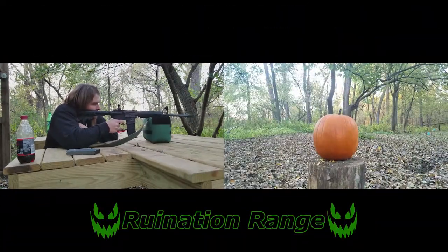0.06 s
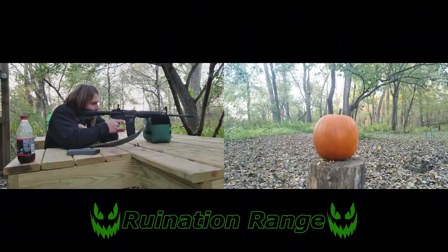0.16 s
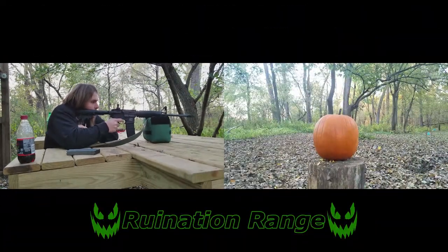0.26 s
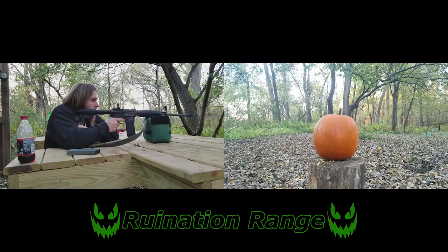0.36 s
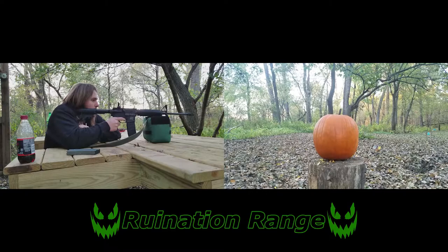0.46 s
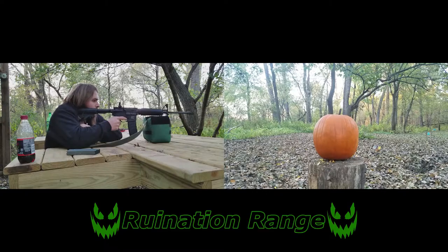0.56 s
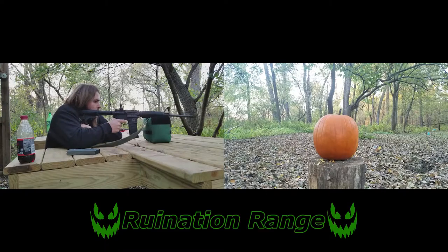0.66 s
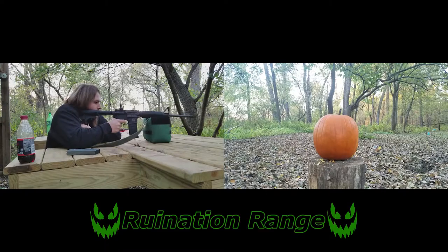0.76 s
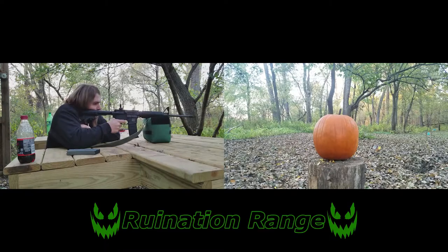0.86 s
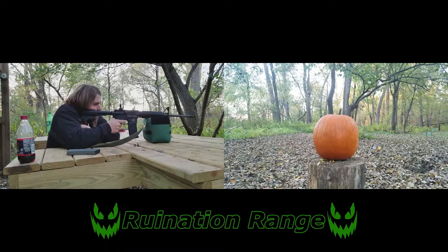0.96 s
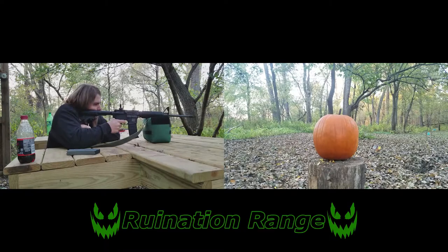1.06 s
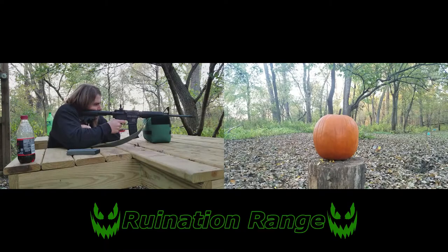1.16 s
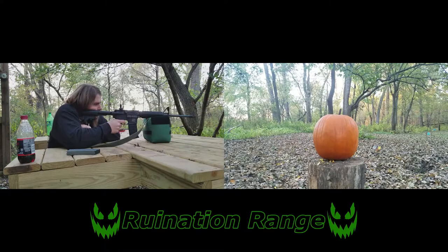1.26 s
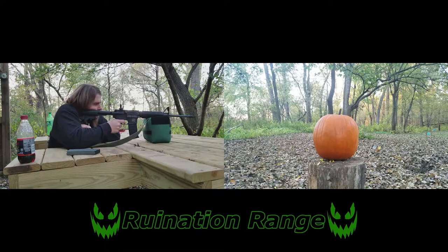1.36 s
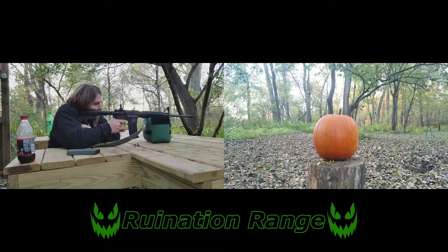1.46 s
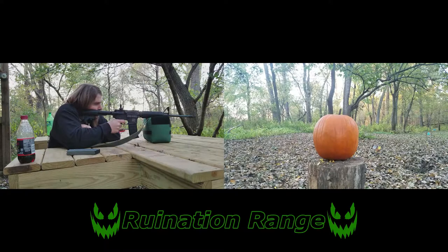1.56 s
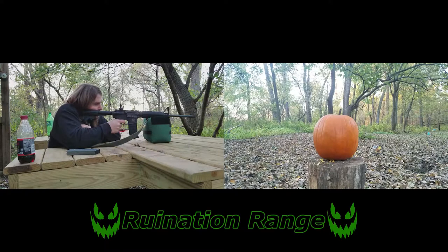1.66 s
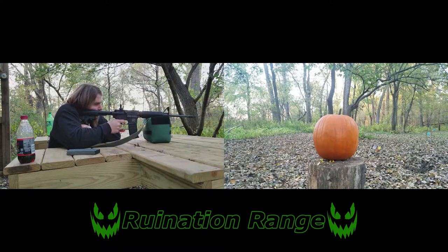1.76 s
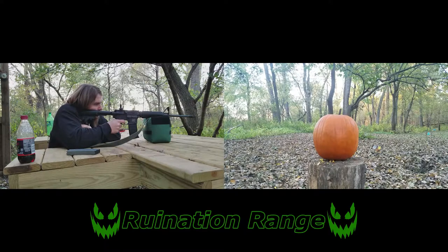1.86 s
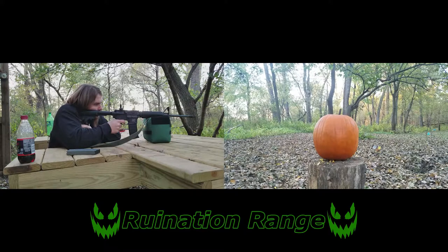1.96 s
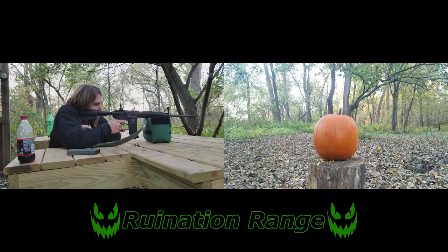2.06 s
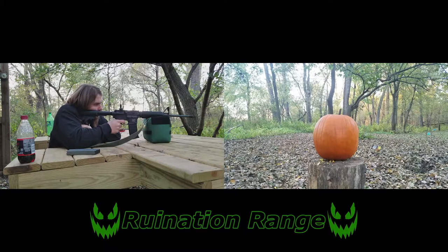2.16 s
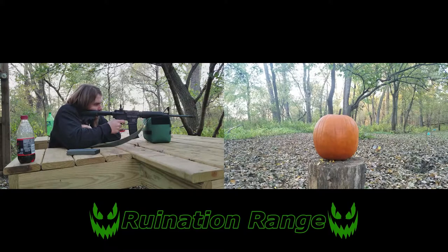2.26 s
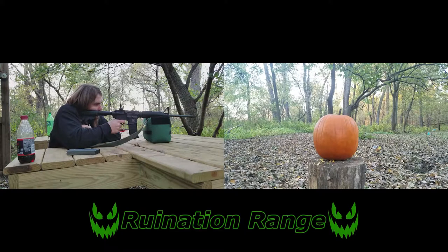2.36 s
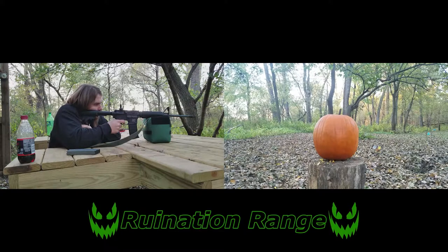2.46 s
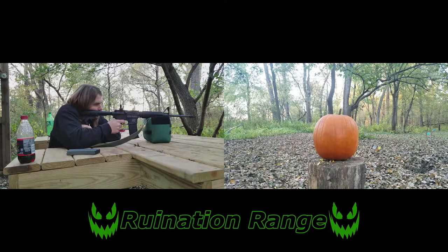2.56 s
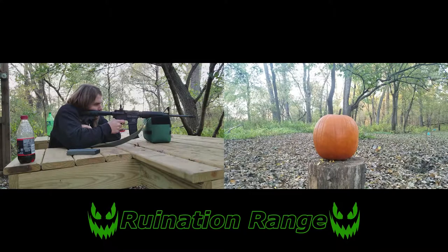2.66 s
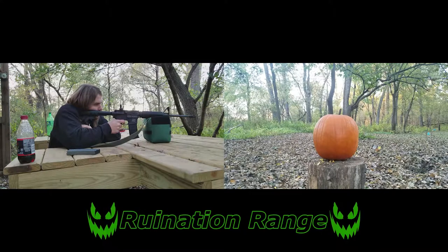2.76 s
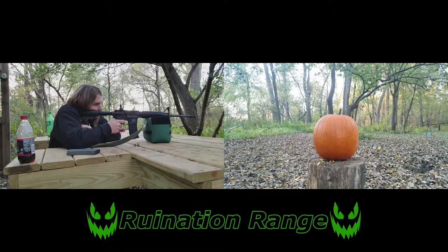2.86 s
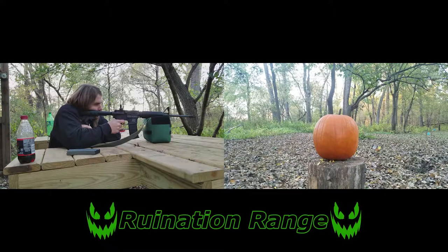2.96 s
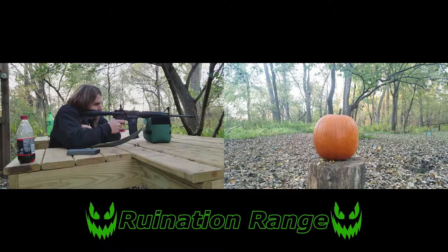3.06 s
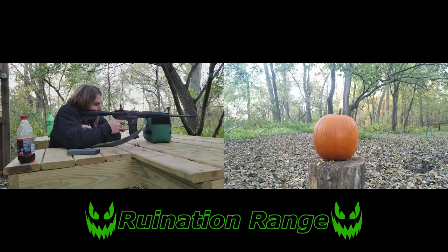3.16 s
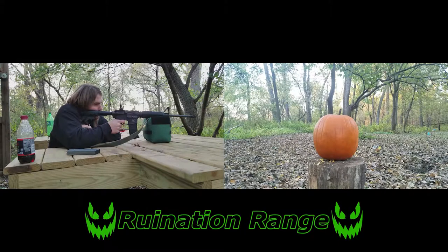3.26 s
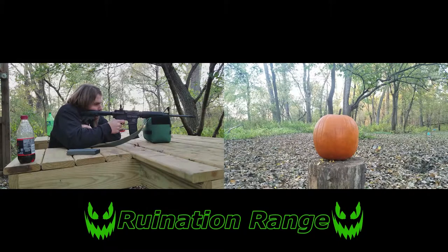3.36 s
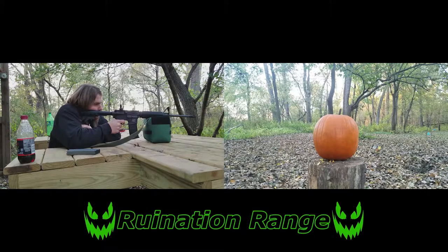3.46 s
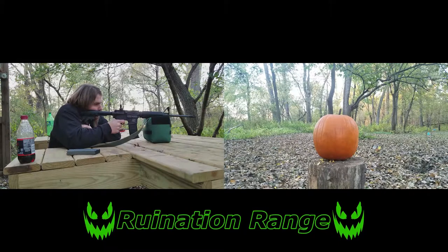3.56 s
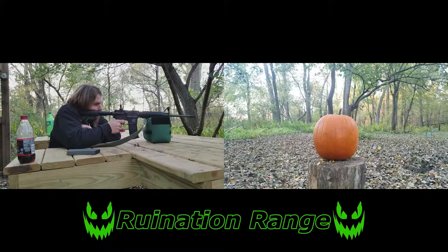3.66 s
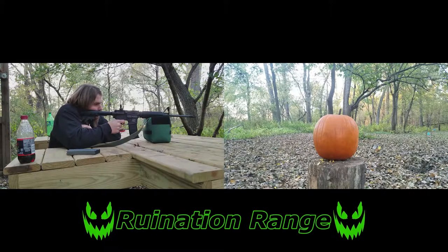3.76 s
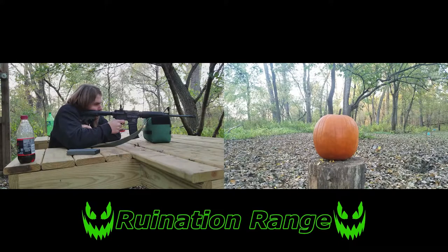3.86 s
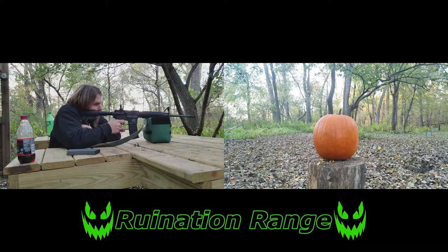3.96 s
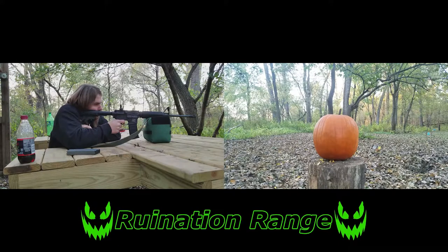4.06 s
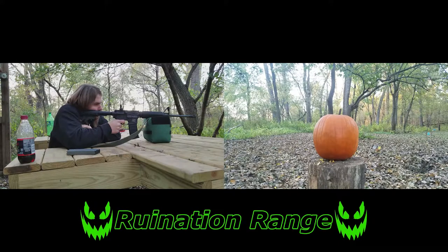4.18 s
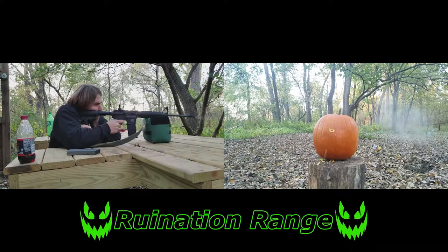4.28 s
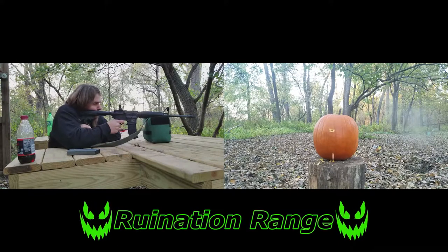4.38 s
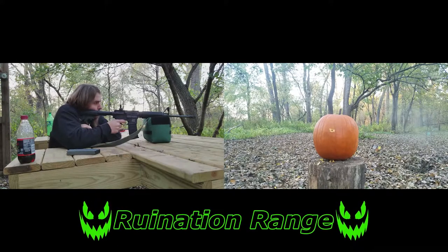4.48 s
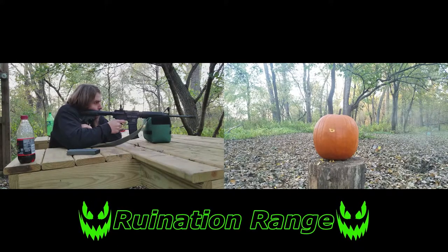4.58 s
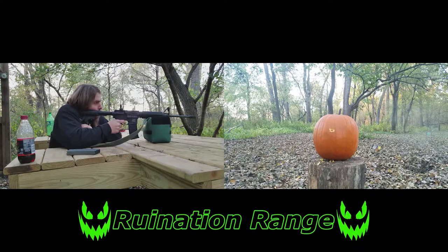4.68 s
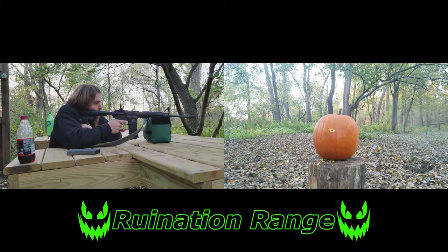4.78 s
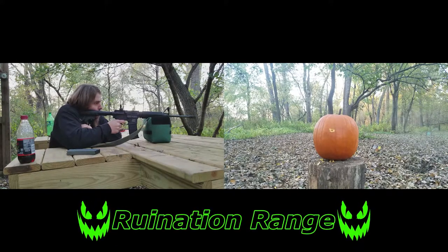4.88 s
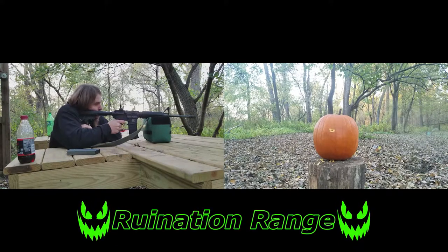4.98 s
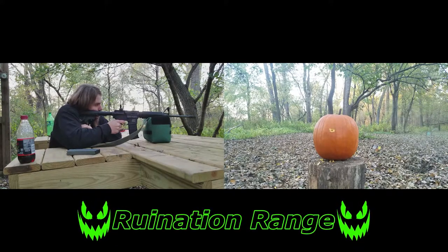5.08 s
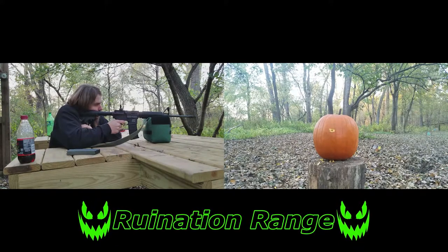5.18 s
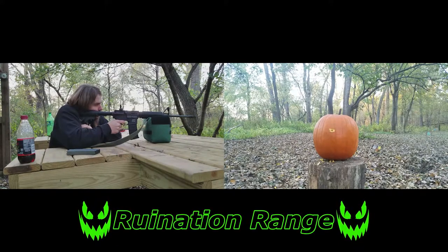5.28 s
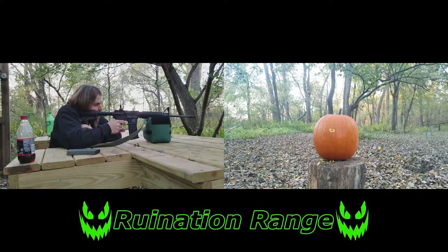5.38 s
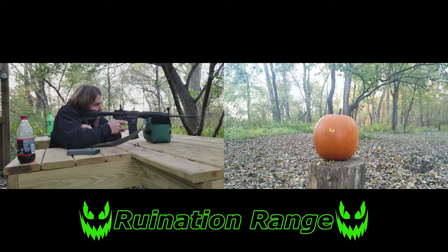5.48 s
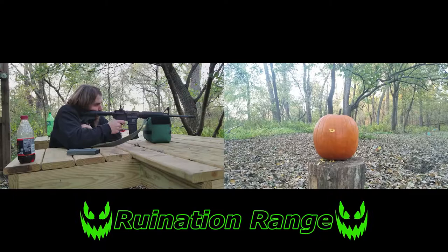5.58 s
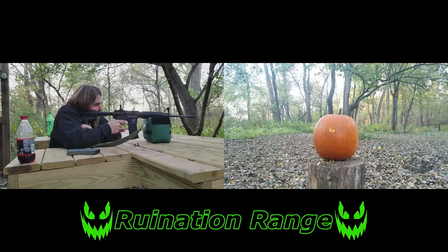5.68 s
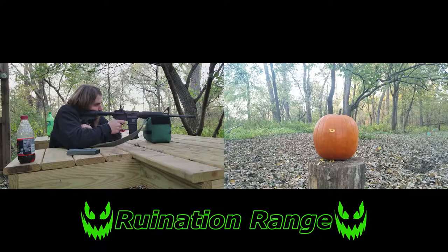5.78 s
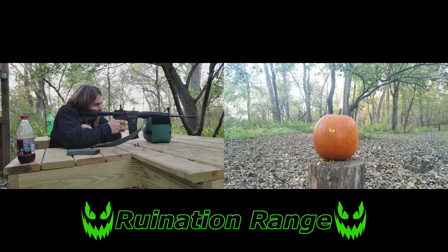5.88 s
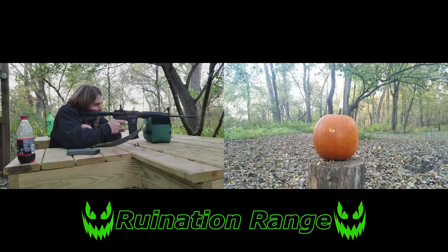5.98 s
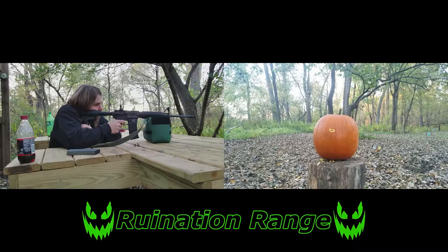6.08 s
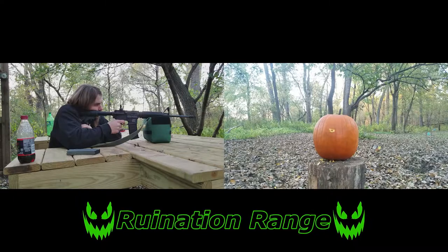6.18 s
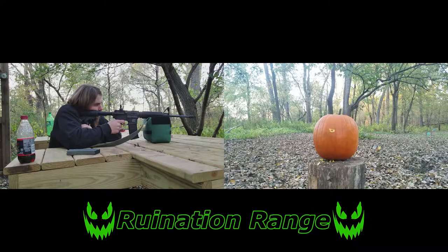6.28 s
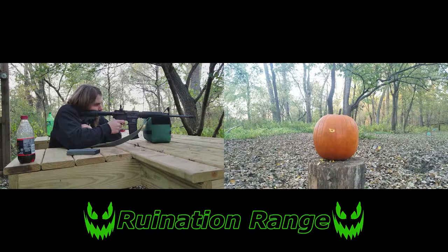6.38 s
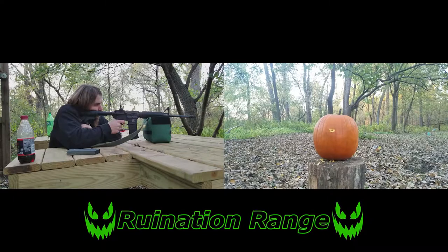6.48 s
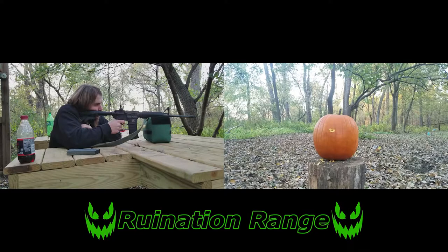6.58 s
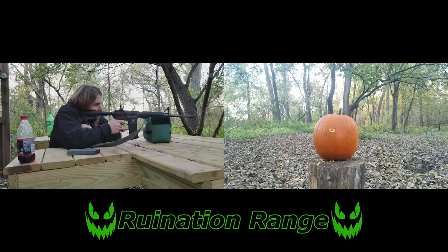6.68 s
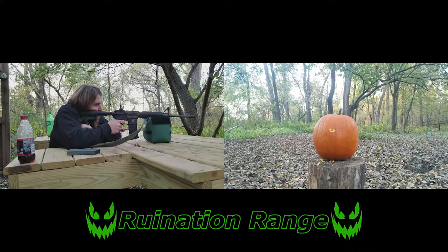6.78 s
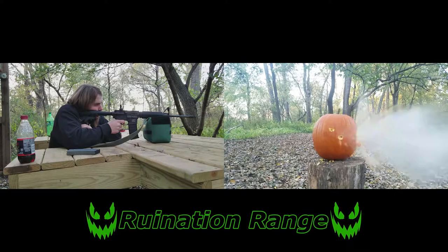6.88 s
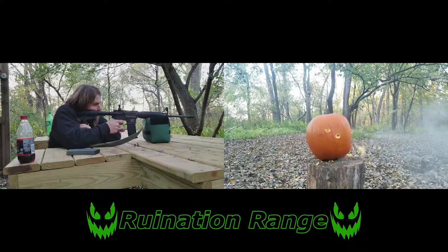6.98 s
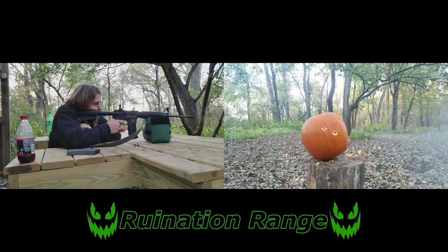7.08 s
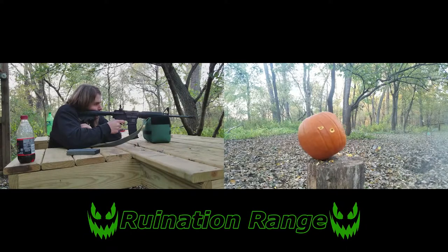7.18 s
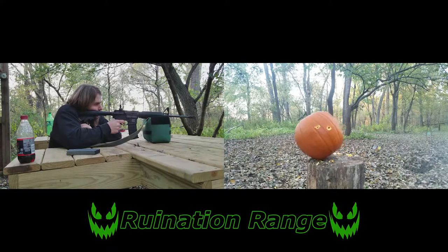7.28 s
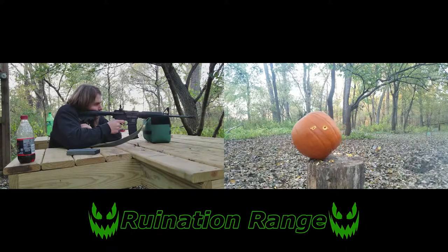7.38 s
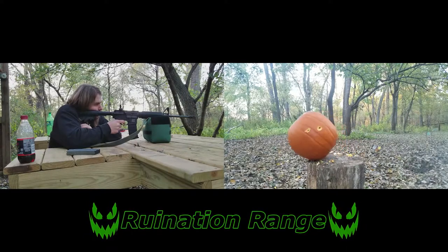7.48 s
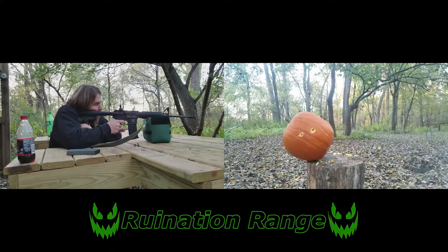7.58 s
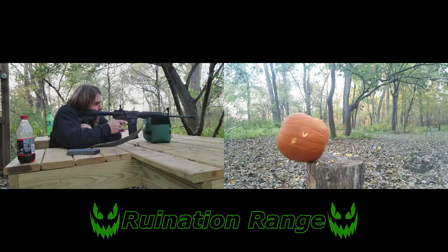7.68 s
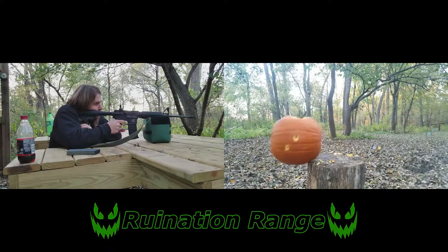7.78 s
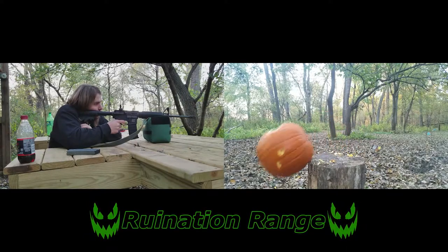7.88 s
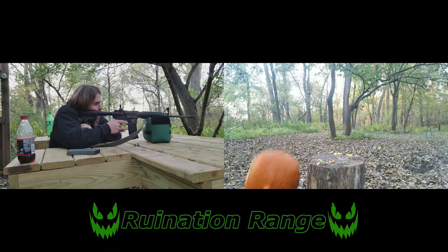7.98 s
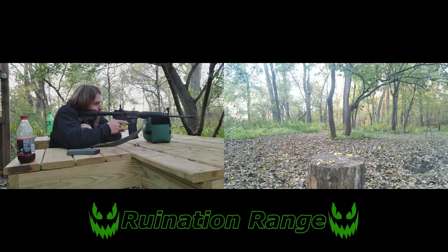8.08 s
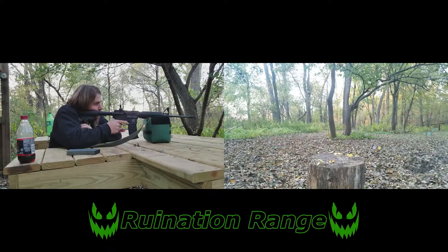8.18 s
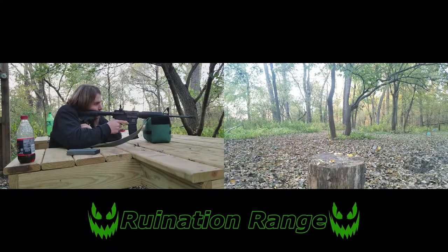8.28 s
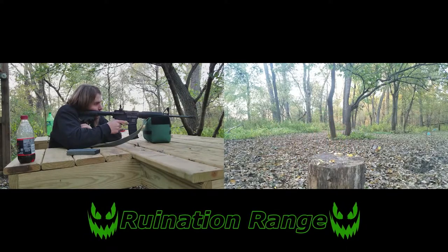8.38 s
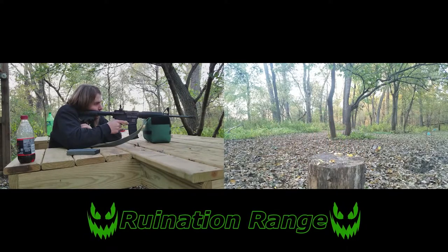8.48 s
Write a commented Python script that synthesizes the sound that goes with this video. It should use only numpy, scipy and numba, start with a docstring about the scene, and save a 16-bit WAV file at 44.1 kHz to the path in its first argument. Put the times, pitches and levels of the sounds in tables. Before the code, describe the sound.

Clothing rustles faintly and a rifle's safety catch snaps with a sharp metal click. After a quiet wait, two very loud shots come nearly three seconds apart, each overloading the small, close microphone and echoing through the woods. Light ticks and rustling fall between them. At the end a pumpkin drops with a soft thump among dry leaves, over faint hiss and distant engine drone.

```python
"""Two rifle shots from a wooden bench in a wood, close to a small camera microphone.
The safety catch clicks first. Each blast overloads the capsule, rings among the near trunks and rolls
back from the far tree line while the gain ducks and recovers. Cloth and leaves rustle, small things tick
and a pumpkin thumps down off its stump. Far off, engines drone and a bird whistles once."""
import sys
import numpy as np
from scipy import signal
from scipy.fft import rfft, irfft
from scipy.io import wavfile
from scipy.ndimage import uniform_filter1d
from numba import njit

SR = 44100
rng = np.random.default_rng(int(sys.argv[2]) if len(sys.argv) > 2 else 0)


def output_pcm(signal):
    """Save a mono or channel-first signal as 16-bit PCM at the path in sys.argv[1].

    Samples are clipped to [-1, 1] before scaling.
    """
    pcm = np.clip(np.atleast_2d(signal).T, -1, 1) * 32767
    wavfile.write(sys.argv[1], SR, np.round(pcm).astype(np.int16))


N = 376481


def undb(db):
    return 10 ** (np.asarray(db) / 20)


def unit(x):
    return x / np.sqrt(np.mean(x ** 2))


def add(out, start_s, x):
    i = int(round(start_s * SR))
    out[i:i + len(x)] += x[:len(out) - i]


def band(x, hz, width_hz):
    """Resonance with gain 1 at its centre."""
    return signal.lfilter(*signal.iirpeak(min(hz, .45 * SR), hz / width_hz, fs=SR), x)


def walk(rate_hz):
    """Smooth wander from one random level to the next."""
    step = int(SR / rate_hz)
    return 0.66 * uniform_filter1d(np.repeat(rng.standard_normal(N // step + 1), step), step)[:N]


def at_hz(table, hz):
    """The columns of a spectrum table, read on a log-frequency axis."""
    freqs, *columns = np.array(table, float).T
    return [np.interp(np.log(hz), np.log(freqs), column) for column in columns]


def burst(peak_db, hz, width_hz, t60_s):
    """A decaying puff of noise in one resonance."""
    t = np.arange(int(.6 * SR)) / SR
    noise = band(band(rng.standard_normal(len(t)), hz, width_hz), hz, 2 * width_hz)
    puff = noise * undb(-60 * t / t60_s) * np.minimum(t / 0.00013, 1)
    return undb(peak_db) * puff / abs(puff).max()


def noise_floor():
    """The recorder's steady electronic hiss over a far rumble that swells a little."""
    # freq_hz, density_db
    floor_spectrum = [(12, -31), (25, 10.5), (59, 8), (106, -5), (133, -14), (196, -10.5), (225, -22.5),
                      (252, -21), (465, -26), (932, -42.5), (1670, -37), (4310, -34.5), (9000, -34),
                      (15500, -34)]
    density_db, = at_hz(floor_spectrum, np.maximum(np.arange(N // 2 + 1) * SR / N, 1))
    noise = undb(-57.5) * unit(irfft(rfft(rng.standard_normal(N)) * undb(density_db), N))
    rumble = band(band(noise, 90, 150), 90, 150)
    return noise + rumble * (undb(1.5 * walk(5)) - 1)


def engines():
    """Distant engines: narrow bands of low noise that waver in level."""
    # pitch_hz, width_hz, level_db
    drones = [(99, 16, -64), (193, 41, -77)]
    return sum(undb(db + 2.5 * walk(4)) * unit(band(rng.standard_normal(N), hz, width))
               for hz, width, db in drones)


def bird():
    """One thin, fluttering whistle far off, falling slightly."""
    start_s, length_s, from_hz, to_hz, level_db = 2.685, .2, 5600, 5480, -74.5
    out, size = np.zeros(N), int(length_s * SR)
    progress = np.arange(size) / size
    pitch_hz = from_hz + (to_hz - from_hz) * progress + 45 * walk(150)[:size]
    envelope = undb(level_db + 5.5 * walk(90)[:size]) * np.sin(np.pi * progress ** 0.21)
    add(out, start_s, envelope * np.sin(2 * np.pi * np.cumsum(pitch_hz) / SR))
    return out


def rustle():
    """Sleeves and dry leaves moving: grainy bright hiss over a dull rub."""
    # peak_s, rise_s, fall_s, hiss_db, rub_db
    swishes = [(.01, .05, 0.062, -66, -55.5), (.19, 0.12, 0.089, -74.5, -76), (.36, 0.044, 0.043, -77, -73),
               (.465, 0.055, 0.047, -60, -65), (.57, 0.06, 0.1, -84, -70), (.77, 0.047, 0.15, -76, -65),
               (5.25, 0.16, 0.24, -66, -64), (5.68, 0.14, 0.17, -61, -64), (5.85, 0.034, 0.16, -63, -72),
               (6.02, .08, 0.098, -69.5, -68), (6.2, 0.11, 0.11, -67.5, -84), (6.5, 0.12, .15, -80, -85),
               (7.73, 0.029, .1, -56, -72), (8.09, 0.092, 0.097, -61.5, -64), (8.2, 0.03, 0.1, -56, -70),
               (8.37, .04, .08, -62, -72), (8.48, 0.028, 0.06, -55.5, -72)]
    t, out = np.arange(N) / SR, 0
    grain = undb(1.6 * walk(170) + 1.8 * walk(45))
    treble = signal.sosfilt(signal.butter(3, [2500, 9500], "band", fs=SR, output="sos"),
                            rng.standard_normal(N))
    hiss = unit(grain * (band(treble, 3020, 2500) + 0.52 * treble))
    rub = unit(grain * band(rng.standard_normal(N), 495.8, 588))
    for peak_s, rise_s, fall_s, hiss_db, rub_db in swishes:
        swell = np.exp(-((t - peak_s) / np.where(t < peak_s, rise_s, fall_s)) ** 2)
        out += swell * (undb(hiss_db) * hiss + undb(rub_db) * rub)
    return out


def ticks():
    """Small ticks around the bench and stump, each with a weaker, broader edge above its pitch."""
    # start_s, peak_db, pitch_hz, t60_s
    contacts = [(.343, -52.5, 7000, 0.022), (.725, -48, 1410, 0.026), (0.772, -51, 1550, .033),
                (2.487, -57.5, 1310, 0.078), (2.655, -73, 2800, .03), (3.392, -67.5, 850, .05),
                (3.412, -69, 850, .04), (5.047, -48, 7000, .02), (5.094, -34, 4000, 0.093),
                (5.106, -46, 6500, .08), (5.137, -48, 7000, .033), (5.222, -50, 7500, .02),
                (5.311, -42, 3040, .024), (5.332, -35.5, 3040, .03), (5.921, -48, 3500, 0.048),
                (6.004, -47.5, 2600, 0.021), (6.006, -50, 1400, 0.033), (6.478, -61, 3720, .033),
                (6.495, -63, 3700, .03), (6.69, -70, 2800, .044), (7.431, -35, 8540, .02),
                (7.762, -54, 7000, .03), (7.797, -55, 8000, .03)]
    out = np.zeros(N)
    for start_s, db, hz, t60 in contacts:
        body = burst(db, hz, hz / 2.6, t60)
        edge = burst(db - 5.5, min(2.2 * hz, 11000), hz, t60)
        add(out, start_s, body + edge)
    return out


def knocks():
    """Dull knocks on wood, each sounding a few broad modes."""
    # start_s, level_db
    blows = [(.025, -53), (.836, -48.5), (0.857, -49), (.925, -63)]
    # pitch_hz, width_hz, gain_db, t60_s
    modes = [(520, 71, 0, 0.15), (750, 730, -3, 0.091), (930, 160, -5, 0.17), (1600, 740, -14, .06)]
    out = np.zeros(N)
    for start_s, db in blows:
        add(out, start_s, sum(burst(db + gain, hz, width, t60) for hz, width, gain, t60 in modes))
    return out


def thumps():
    """Soft heavy contacts that sag in pitch as they die; the last ones are the pumpkin landing."""
    # start_s, level_db, pitch_hz, t60_s
    contacts = [(.575, -44, 100.3, 0.194), (8.188, -28, 151, 0.11), (8.242, -22, 193, 0.053),
                (8.276, -30, 151, .08)]
    rise_s, sag_share = 0.002, 0.2976
    out, t = np.zeros(N), np.arange(int(.4 * SR)) / SR
    for start_s, db, hz, t60 in contacts:
        pitch_hz = hz * (1 - sag_share * np.minimum(t / t60, 1))
        envelope = undb(db - 60 * t / t60) * (1 - np.exp(-t / rise_s))
        add(out, start_s, envelope * np.sin(2 * np.pi * np.cumsum(pitch_hz) / SR))
    return out


def safety_catch():
    """A steel lever snaps home by the microphone: its modes, a crack and a tail off the bench."""
    # start_s, level_db
    blows = [(.6285, -24), (.6313, -9), (.6338, -18)]
    # steel lever: pitch_hz, gain_db, t60_s (capped below)
    modes = [(700, 6.5, 0.15), (1310, 2, 0.073), (1480, 9, 0.043), (2620, -1, 0.059), (2930, -28.5, 0.25),
             (3545, -24, 0.012), (3600, -26.5, 0.066), (4110, -1.5, 0.091), (4200, -38.5, 0.045),
             (4850, -26.5, 0.073), (5770, -39, 0.079), (6971, -20.5, 0.054)]
    # the bench answers the first blow: delay_s, peak_db, pitch_hz, width_hz, t60_s
    bench = [(0.0057, -33, 332, 250, 0.085), (0.027, -44, 190, 320, 1), (0.022, -51, 4500, 2800, .35),
             (0.016, -49.5, 1700, 1200, .3), (0.023, -34, 99, 40, 0.19), (.01, -35, 30, 30, .3)]
    out, t = np.zeros(N), np.arange(int(.2 * SR)) / SR
    for start_s, db in blows:
        ring = sum(rng.choice([-1, 1]) * undb(gain - 60 * t / min(t60, .06))
                   * np.sin(2 * np.pi * hz * t) for hz, gain, t60 in modes)
        crack = (burst(db - 2, 1700, 3100, t60_s=0.005)
                 + burst(db - 10, 6700, 2500, t60_s=0.0068)
                 + burst(db - 28.5, 11890, 6040, t60_s=0.0095))
        tail = burst(db - 25, 3000, 4000, t60_s=0.2)
        add(out, start_s, undb(db - 27.5) * ring)
        add(out, start_s, crack + tail)
    for delay_s, *sound in bench:
        add(out, blows[0][0] + delay_s, burst(*sound))
    return out


def trunk_arrivals(t, thicken_s, push_s):
    """Echo arrivals: lone pressure pushes at first, ever denser as the wave meets more trees."""
    density = np.clip(0.018 + (t / thicken_s) ** 2, 0, 1)
    hits = (rng.random(len(t)) < density) / np.sqrt(density)
    hits[0] = 12.0  # the direct sound
    lean = np.exp(-t / push_s)  # early echoes keep the sign of the blast
    return hits * (rng.standard_normal(len(t)) * (1 - 0.6 * lean) + 0.24 * lean)


def tree_echoes(t, count):
    """One tail per blast off the same trees; third-octave bands fade at their own pace."""
    # near trunks and ground: freq_hz, level_db, t60_s
    near_trees = [(40, -6.5, 0.47), (91, 8.5, 0.85), (138, 23, 0.51), (293, 26, .6), (480, 26.5, 0.8),
                  (900, 27.5, 0.62), (1857, 27, 0.61), (3240, 25.5, 0.57), (4270, 31.5, 0.45),
                  (6450, 20, 0.5), (9000, 17, 0.44), (16000, 4.5, 0.47)]
    # far tree line: freq_hz, level_db, loss_db_per_s
    far_trees = [(40, -36, 0), (100, -12.5, -3), (268.8, -6.5, 0), (641.5, 1, -1), (890, -1, 0),
                 (1380, 1, 6), (2046, -2.5, 9), (3320, -8, 14.5), (3870, -7.5, 17), (4800, -15, 21),
                 (6476, -20.5, 34), (16000, -33.5, 87)]
    # rolls of the far echo: delay_s, hold_s, level_db, swell_db_per_s, fade_db_per_s
    returns = [(0.283, 0.025, -8, 11.5, 38), (1.35, 0.19, -40, 18, 29.5)]
    shared = trunk_arrivals(t, thicken_s=.25, push_s=0.079)
    own = np.array([trunk_arrivals(t, thicken_s=.25, push_s=.06) for _ in range(count)])
    spectrum, echoes = rfft(shared + 0.86 * own), 0
    freqs = np.maximum(np.fft.rfftfreq(len(t), 1 / SR), 1)
    roll = np.hypot(*(undb(db - swell * np.maximum(delay - t, 0) - fade * np.maximum(t - delay - hold, 0))
                      for delay, hold, db, swell, fade in returns))
    for hz in 25 * 2 ** (np.arange(29) / 3):
        third_octave = irfft(spectrum * np.clip(1 - abs(3 * np.log2(freqs / hz)), 0, 1))
        near_db, t60 = at_hz(near_trees, hz)
        far_db, loss = at_hz(far_trees, hz)
        envelope = np.hypot(undb(near_db - 60 * t / t60), roll * undb(far_db - loss * t))
        echoes += third_octave * envelope * np.sqrt(SR / hz) / 2
    return echoes


def rifle_shots():
    """Each blast is a pressure front, a longer suction behind it and the answer of the trees."""
    # start_s, gain_db
    shots = [(4.2601, -5), (6.9107, -4.5)]
    # hammer, bright snap and one slap echo: offset_s, peak_db, pitch_hz, width_hz, t60_s
    transients = [(-.0075, -15, 3000, 1500, .008), (-.0075, -22, 8000, 9000, .007),
                  (.055, 28, 6500, 900, .015), (.0535, 18, 12500, 3000, .015), (.257, 13, 550, 500, .04)]
    push_s, suction_s, pressure_db = .005, 0.022, 22
    out, t = np.zeros(N), np.arange(1 << 17) / SR
    push = t / push_s * np.exp(1 - t / push_s)
    suction = (t / suction_s * np.exp(1 - t / suction_s)) ** 4
    blast = undb(pressure_db) * (push - suction)
    for (start_s, db), echo in zip(shots, tree_echoes(t, len(shots))):
        add(out, start_s, undb(db) * (blast + echo))
        for offset_s, *sound in transients:
            add(out, start_s + offset_s, burst(*sound))
    return out


def scene():
    """Mono, from the bench; the small hole in front of the capsule lifts one treble band of the events."""
    events = rifle_shots() + safety_catch() + ticks() + knocks() + thumps() + rustle() + bird()
    port_ring = undb(7) * band(events, hz=3070, width_hz=650)
    return (events + port_ring + noise_floor() + engines())[None]


@njit
def auto_gain(x, loud, floor, fall_s, hold_s, recover_s):
    """The gain falls while the sound is loud, waits and creeps back."""
    out, gain, wait = np.empty(len(x)), 1., 0.
    for i in range(len(x)):
        wait = hold_s * SR if loud[i] else wait - 1
        gain += (floor - gain) / (fall_s * SR) if wait > 0 else (1 - gain) / (recover_s * SR)
        out[i] = gain * x[i]
    return out


@njit
def limiter(x, ceiling, attack_s, release_s):
    """A quick follower turns the sound down when its level passes the ceiling."""
    out, level = np.empty(len(x)), 0.
    for i in range(len(x)):
        lag_s = attack_s if abs(x[i]) > level else release_s
        level += (abs(x[i]) - level) / (lag_s * SR)
        out[i] = x[i] * min(1., ceiling / (level + 1e-9))
    return out


def record(dry):
    """The camera: capsule overload, coupling capacitors, gain control, clipping and band limit."""
    suction_rail_db, pressure_rail_db = 9, 18
    coupling_hz, rumble_hz, subsonic_hz, top_hz = 74, 38, 50, 15660
    x = np.clip(dry[0], -undb(suction_rail_db), undb(pressure_rail_db))
    x += 0.01 * dry[0]  # the rails give a little
    for hz in (coupling_hz, rumble_hz):  # a pinned capsule sags back to zero
        x = signal.lfilter(*signal.butter(1, hz, "high", fs=SR), x)
    loud = uniform_filter1d(abs(x), size=4096) > undb(-30)
    x = auto_gain(x, loud, floor=undb(-13.5), fall_s=.1, hold_s=0.61, recover_s=0.82)
    x = limiter(x, ceiling=undb(-1), attack_s=0.0089, release_s=0.066)
    x = np.clip(signal.lfilter(*signal.butter(2, subsonic_hz, "high", fs=SR), x), -1, 1)
    return signal.sosfilt(signal.ellip(10, .2, 70, top_hz, fs=SR, output="sos"), x)[None]


dry = scene()
out = record(dry)
output_pcm(out)
```